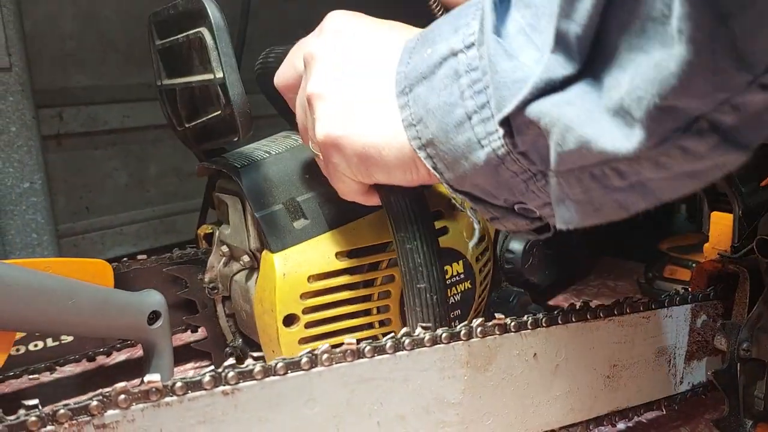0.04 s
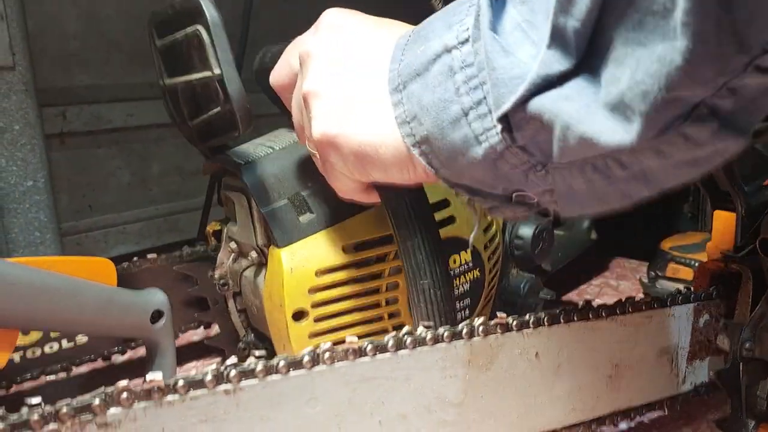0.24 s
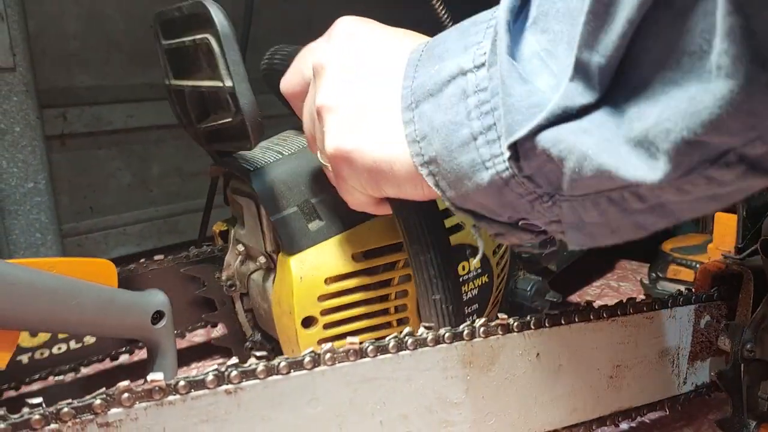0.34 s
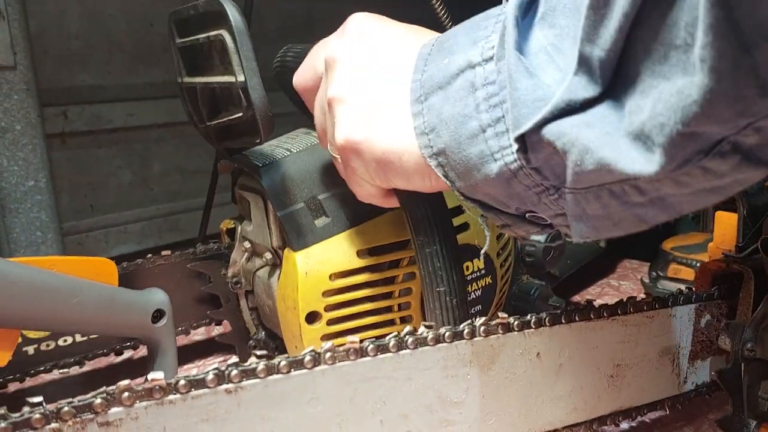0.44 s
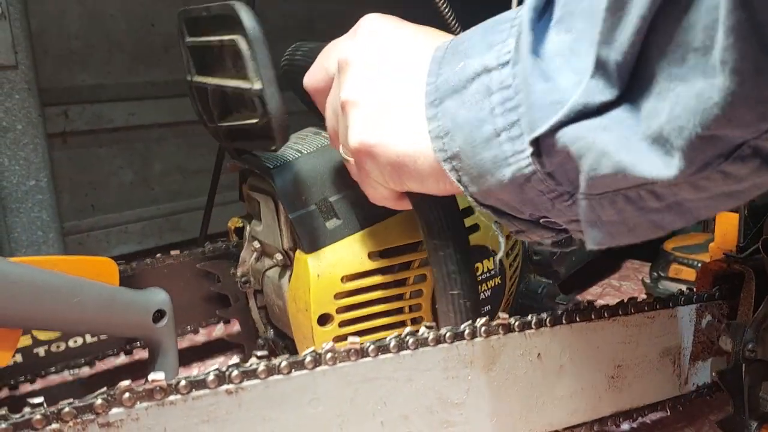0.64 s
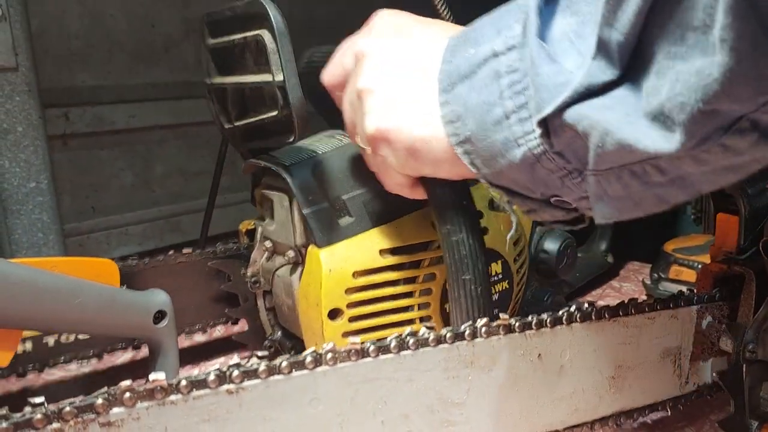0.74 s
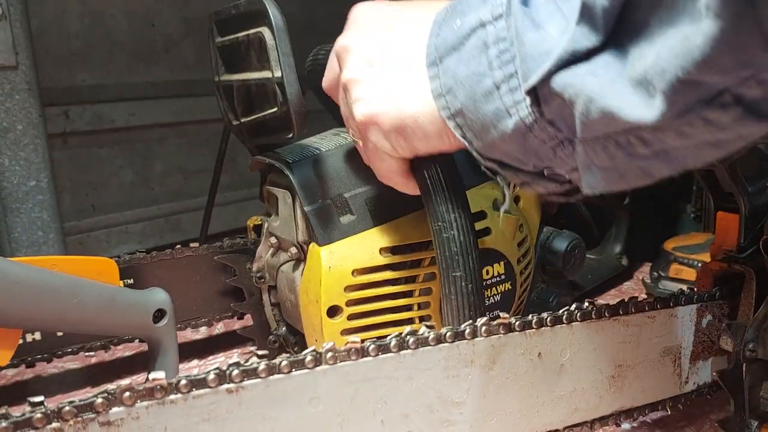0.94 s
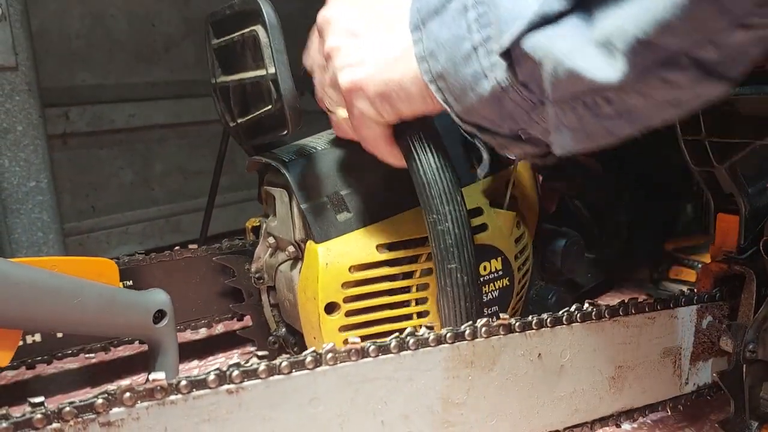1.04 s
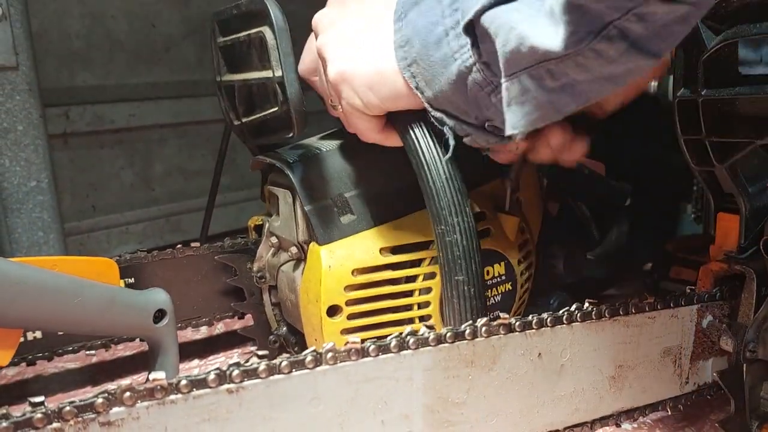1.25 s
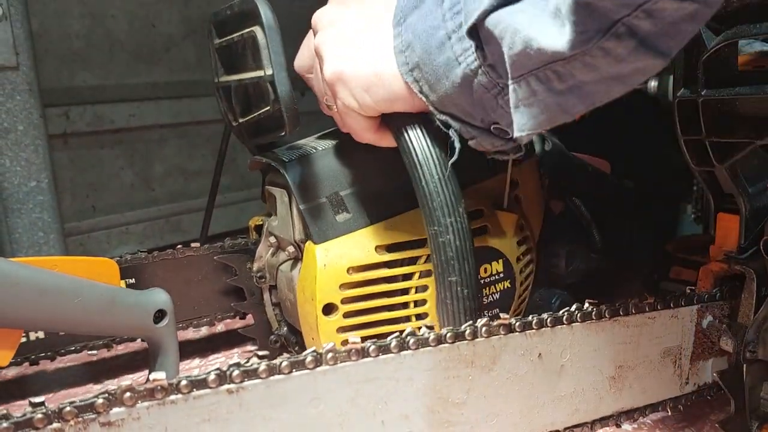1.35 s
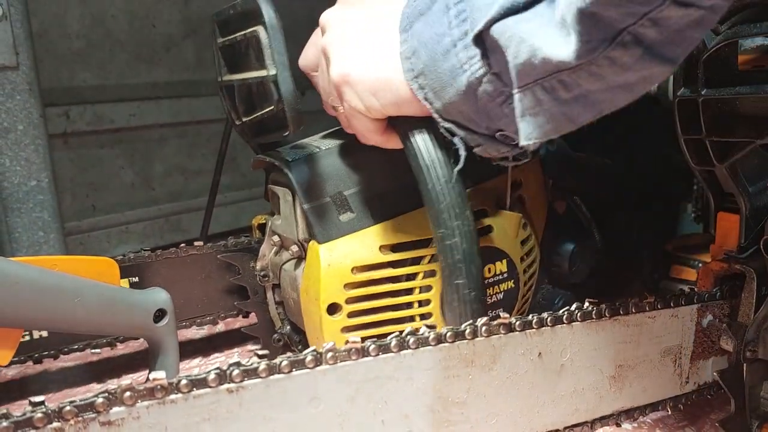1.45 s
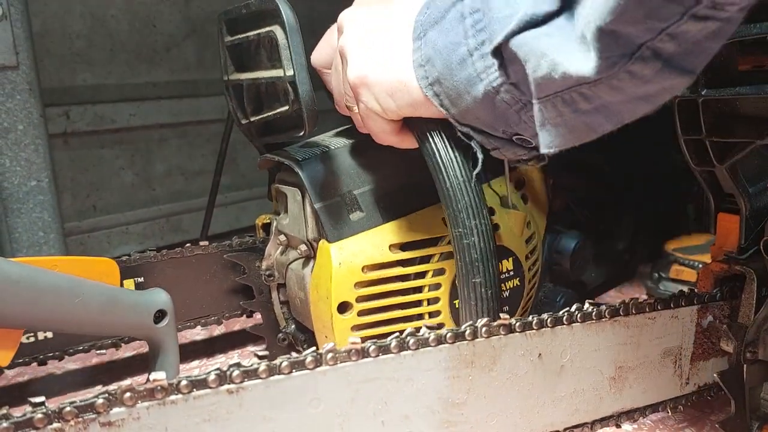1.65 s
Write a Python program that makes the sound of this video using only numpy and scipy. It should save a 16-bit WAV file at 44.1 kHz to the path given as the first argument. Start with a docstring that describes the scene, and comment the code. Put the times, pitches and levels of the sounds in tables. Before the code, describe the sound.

Close up, a chainsaw starter catches and jolts on a hollow metal bed, knocks, then catches again harder; the cord winds in with a ratcheting metallic tick and a final clack, in a nearly quiet place with close walls.

```python
"""Chainsaw starter, two tugs

A chainsaw's recoil starter is tugged twice, close by: the pawls catch with a clack and the saw jolts on a
hollow metal bed. Then the spring winds the rasping cord back in, the pawls tick over the flywheel and ring,
and the handle clacks home; the engine never fires. Clacks and scrapes are shaped noise, rings and booms
are fading sine waves, and nearby walls and still air surround them."""
import sys
import numpy as np
from scipy import signal
from scipy.fft import rfft, irfft, next_fast_len
from scipy.io import wavfile
from scipy.ndimage import uniform_filter1d, map_coordinates

SR = 44100
rng = np.random.default_rng(int(sys.argv[2]) if len(sys.argv) > 2 else 0)


def store_pcm(level_fs):
    """Save levels as 16-bit WAV."""
    pcm = np.round(np.clip(level_fs, -1, 1) * 32767).astype(np.int16)
    wavfile.write(sys.argv[1], SR, np.atleast_2d(pcm).T)


N = 74970  # length of the scene [samples]
T = np.arange(SR // 2) / SR  # the half second [s] given to each single hit

# In all tables, t60 is the time a sound takes to fade by 60 dB.
# how alike the two ears hear each pitch: (frequency [Hz], left-right likeness [-1 to 1])
LIKENESS = [(60, 1), (140, 1), (300, 0.67), (640, 0.69), (1400, 0.031), (3000, 0.23), (6500, -0.06),
            (14000, -0.18)]
# the steel of the first pawl while it is free: (frequency [Hz], level [dB], t60 [s])
FREE_PAWL = [(5662, 0, .17), (5745, -19, .1), (6368, -15, .09), (12054, -18, .11), (12453, -19, .1),
             (13532, -19, .1)]


def amp(db):
    """Turn decibels into a plain gain."""
    return 10 ** (np.asarray(db) / 20)


def unit(x):
    """Scale a sound to an average strength (rms) of 1."""
    return x / np.sqrt(np.mean(x ** 2) + 1e-20)


def along(points, hz):
    """Read a curve of (Hz, value) points, with frequency on a log axis."""
    point_hz, values = np.transpose(points)
    return np.interp(np.log(hz + 1), np.log(point_hz + 1), values)


def level(rows):
    """Gain per sample from (time [s], level [dB]) points."""
    return amp(np.interp(np.arange(N) / SR, *np.transpose(rows)))


def fade(t60):
    """Exponential decay, as in anything that loses a fixed share of its motion per moment."""
    return np.exp(-np.log(1000) * T / t60)


def rise(seconds):
    """Soft start that climbs quickly at first, then levels off."""
    return 1 - np.exp(-T / seconds)


def add(out, s, x):
    """Mix x into out from time s."""
    start = max(round(s * SR), 0)
    out[:, start:start + x.shape[-1]] += x[..., :N - start]


def filtered(x, response):
    """Multiply the spectrum of x by a response of frequency."""
    size = x.shape[-1]
    padded = next_fast_len(size + 4096)
    spectrum = rfft(x, padded) * response(np.fft.rfftfreq(padded, 1 / SR))
    return irfft(spectrum, padded)[..., :size]


def ear_angle(hz):
    """Half the angle between the ears: zero when they hear the same, wider when they differ."""
    return np.arccos(np.clip(along(LIKENESS, hz), -1, 1)) / 2


def noise(colour, size, tilt_db=0, grain_db=0):
    """Stereo noise of rms 1, tilted per octave and made grainy by quick random level changes."""
    grains = amp(grain_db * unit(uniform_filter1d(rng.standard_normal(size), size=30)))

    def shape(hz):
        tone = amp(along(colour, hz) + tilt_db * np.log2(hz / 1000 + 1))
        return tone * [np.cos(ear_angle(hz)), np.sin(ear_angle(hz))]

    # mid is shared by the ears; side has opposite signs in them
    mid, side = filtered(grains * rng.standard_normal((2, size)), shape)
    return unit(np.array([mid + side, mid - side]))


def ring(modes, scatter_db):
    """Fading sine waves of a struck body, random in level; where the ears differ, out of step between them."""
    out = np.zeros((2, len(T)))
    for (hz, db, t60), (size, skew) in zip(modes, rng.standard_normal((len(modes), 2))):
        apart = ear_angle(hz) * np.tanh(2 * skew)
        wave = np.sin(2 * np.pi * hz * T + np.array([[apart], [-apart]]))
        out += amp(db + scatter_db * size) * fade(t60) * wave
    return out


def wobble(rate):
    """A smooth random curve for each ear, partly shared, with rate random knots a second."""
    def curve():
        knots = rng.standard_normal(int(N * rate / SR) + 4)
        return map_coordinates(knots, [np.arange(N) * rate / SR])

    return .8 * curve() + .6 * np.array([curve(), curve()])


def steel(modes, strikes):
    """Steel keeps ringing from strike to strike; each (time, dB) tops up the energy of its modes."""
    waver_db, waver_rad, waver_per_s = 1.3, 0.2, 60  # slight flutter of the ring
    out = np.zeros((2, N))
    for hz, db, t60 in modes:
        energy = np.zeros((2, N))
        for (s, strike_db), luck in zip(strikes, rng.standard_normal(len(strikes))):
            strike = amp(db + strike_db + 1.0 * luck) * rise(0.0019) * fade(t60)
            add(energy, s, strike ** 2)
        phase = 2 * np.pi * (hz * np.arange(N) / SR + rng.random()) + waver_rad * wobble(waver_per_s)
        out += np.sqrt(energy) * amp(waver_db * wobble(waver_per_s)) * np.sin(phase)
    return out


def hollow(x):
    """The hollow casing strengthens or weakens bands of a noise, which is then set to rms 1."""
    # hollow resonances of the casing: (frequency [Hz], width [Hz], boost [dB])
    casing_bands = [(950, 120, 6), (2127, 140, -0.5), (2940, 100, 4), (3740, 100, 4), (4240, 220, 4.5),
                    (4860, 160, 6), (5510, 350, 5), (6850, 300, 5)]

    def boost(f):
        return amp(sum(db * np.exp(-((f - hz) / width) ** 2) for hz, width, db in casing_bands))

    return unit(filtered(x, boost))


def air():
    """Still air is a faint, steady noise."""
    # colour of the air: (frequency [Hz], relative level [dB])
    air_colour = [(15, -45.5), (25, 9.5), (140, -7), (209, -11.5), (598, -19), (722, -11), (804, -17.5),
                  (1750, -19), (8350, -34), (11800, -36), (15500, -50)]
    return amp(-50) * noise(air_colour, N)


def walls(x):
    """Nearby walls answer with many tiny echoes, blended into a short fading noise."""
    # how long the walls answer: (frequency [Hz], t60 [s])
    wall_fade = [(150, 0.12), (800, 0.16), (4000, 0.21), (14000, 0.114)]
    hz, t, grid = signal.stft(rng.standard_normal((2, len(T))), SR, nperseg=256)
    faded = grid * np.exp(-np.log(1000) * t / along(wall_fade, hz)[:, None])
    tail = signal.istft(faded, SR, nperseg=256)[1][:, :len(T)] * rise(0.0057)
    tail = filtered(tail / np.linalg.norm(tail[0]), lambda hz: hz / (hz + 300))  # less bass
    return signal.fftconvolve(x, tail, axes=1)[:, :N]


def cord():
    """The braid hisses and flicks through the eyelet and the spool scrapes round in short uneven slips."""
    # the cord slides through its eyelet: (time [s], level [dB])
    slide_level = [(0, -57.5), (.09, -60.5), (.14, -44.5), (.22, -48.5), (.3, -55), (.43, -68.5), (.5, -64),
                   (.55, -50.5), (.61, -52), (.68, -46.5), (.78, -42), (.87, -70), (1.3, -62),
                   (1.345, -37.5), (1.39, -76), (1.64, -69.5), (1.7, -46)]
    # colour of the slide: (frequency [Hz], relative level [dB])
    slide_colour = [(500, 13), (1500, 6), (3000, 3.5), (6000, 1), (9000, 0.5), (12500, 7.5), (15500, -3)]
    # the cord flicks against the eyelet: (time [s], level [dB], brightness [dB per octave])
    flick_rows = [(0.1598, -34, 5), (.701, -33, -3), (0.7436, -29, 0.5), (0.7603, -35, 3.5),
                  (.9034, -34, -6.5), (0.9122, -30, 0), (0.917, -34, 4)]
    # colour of the flicks: (frequency [Hz], relative level [dB])
    flick_colour = [(400, -6), (1200, 15.5), (2500, -7), (6000, -7), (11000, -3), (15500, -5)]
    # the spool rasps as it rewinds: (time [s], level [dB])
    rewind_level = [(.85, -84), (.89, -43), (.915, -34.5), (.935, -37), (1.06, -37.5), (1.18, -42),
                    (1.22, -44.5), (1.3, -64), (1.4, -74.5)]
    # colour of the rasp: (frequency [Hz], relative level [dB])
    rewind_colour = [(200, -13), (600, 0), (1100, 2), (2000, -11), (3500, -9.5), (6000, -11), (8000, -18.5),
                     (12000, -15), (15500, -34.5)]
    slips_per_s, slip_t60_s, slip_spread_db = 260, 0.016, 4
    rub_share = 0.42  # steady rub beneath slips of rms 1

    out = level(slide_level) * amp(wobble(90)) * noise(slide_colour, N, grain_db=2)
    for s, db, bright_db in flick_rows:
        flick = rise(0.000393) * fade(0.032) * noise(flick_colour, len(T), bright_db)
        add(out, s, amp(db) * flick)
    slips = (rng.random(N) < slips_per_s / SR) * amp(slip_spread_db * rng.uniform(-1, 1, N))
    fading_slips = signal.fftconvolve(slips, fade(slip_t60_s))[:N]
    uneven = unit(rub_share + unit(fading_slips))
    return out + level(rewind_level) * uneven * noise(rewind_colour, N, grain_db=2.5)


def knocks():
    """The plastic casing gives short woody knocks as the cord takes up or slackens."""
    # each knock; some lack the lower modes, by their low cut:
    # (time [s], level [dB], brightness [dB per octave], low cut [Hz])
    knock_rows = [(0.118, -41.5, 0.5, 100), (.159, -35, -1, 900), (0.3353, -16, 0.5, 100),
                  (.546, -33, -4, 760), (0.629, -49, 2, 100), (0.6612, -18, 0.9, 100), (.931, -29, -7, 600),
                  (1.0752, -28.5, -4, 700), (1.2442, -41, -8.5, 503), (1.681, -32, -11, 590)]
    # colour of the crack: (frequency [Hz], relative level [dB])
    knock_colour = [(150, -13.5), (450, -8), (700, 2.5), (1500, -14), (2100, -9.5), (3000, -25.5),
                    (6000, -27.5), (8500, -38), (15000, -41.5)]
    # ringing of the casing: (frequency [Hz], level [dB], t60 [s])
    knock_modes = [(262, 0, .09), (435, -4, .07), (485, -2, .07), (600, -12, .08), (840, -9, .05),
                   (985, -4, .05), (1265, -6, .055), (1600, -16, .04), (1975, -8, .035), (2065, -7, .035),
                   (2380, -18, .03), (2800, -18, .03), (3450, -20, .03), (4230, -17, .028),
                   (5500, -21, .02)]
    out = np.zeros((2, N))
    for s, db, bright_db, lowest_hz in knock_rows:
        crack = hollow(noise(knock_colour, len(T), bright_db)) * (fade(0.031) + amp(-15.5) * fade(0.081))
        body = ring(knock_modes, scatter_db=2.0)
        knock = amp(db) * rise(0.00021) * (amp(-0.5) * crack - amp(-2.2) * body)
        high_pass = signal.butter(2, lowest_hz, "high", fs=SR, output="sos")
        add(out, s, signal.sosfilt(high_pass, knock))
    return out


def handle():
    """The handle lands on the housing, bounces, and shakes the seated pawl once more."""
    # each landing: (time [s], level [dB], brightness [dB per octave], knock [dB], steel ring [dB])
    landing_rows = [(1.3174, -24, 3, -27, -27.5), (1.3409, -29.5, -6, -22.5, -55),
                    (1.3682, -48, 11.5, -60, -70)]
    # colour of the crack: (frequency [Hz], relative level [dB])
    handle_colour = [(200, -14.5), (650, 3.5), (880, 3), (1100, 0.5), (1400, -10.5), (2000, -21),
                     (2400, -2), (3400, -15), (6300, -5.5), (9000, -18.5), (15000, -23)]
    # ringing of the knock: (frequency [Hz], level [dB], t60 [s])
    handle_modes = [(883, -7, 0.041), (1087, -5, 0.043), (1690, -5, 0.017), (2350, -12, 0.018)]
    seated_share = 0.28  # of its ring time that a seated pawl keeps
    out = np.zeros((2, N))
    for s, db, bright_db, knock_db, _ in landing_rows:
        crack = noise(handle_colour, len(T), bright_db) * (fade(0.035) + amp(-14.5) * fade(0.0723))
        knock = ring(handle_modes, scatter_db=2.5)
        add(out, s, rise(0.000309) * (amp(db) * crack + amp(knock_db) * knock))
    seated = [(hz, db, t60 * seated_share) for hz, db, t60 in FREE_PAWL]
    return out + steel(seated, [(s, steel_db) for s, *_, steel_db in landing_rows])


def pawls(count=3):
    """A pawl drops off each flywheel lug, bounces and scrapes; the pawls and their spring ring until they seat."""
    # each tick as the cord rewinds: (time [s], click before the gains below [dB],
    # brightness [dB per octave], ring of first pawl [dB], of second pawl [dB], of their spring [dB])
    tick_rows = [(0.9411, -21, 0.5, -21.5, -25.5, -29), (0.978, -20, 3, -18, -24.5, -47),
                 (1.0142, -22.5, -1, -19.5, -33, -28.5), (1.0497, -21, -2, -18, -30, -30.5),
                 (1.085, -19.5, 2.5, -19, -21, -24.5), (1.1231, -22, 0, -15, -19, -45),
                 (1.1653, -24, -3, -42, -26, -24.5), (1.2252, -24.5, 3, -40, -27, -27)]
    # colour of the scrape: (frequency [Hz], relative level [dB])
    tick_colour = [(500, -2), (1000, -2.5), (2000, -0.5), (3500, -2.5), (4500, -2.5), (5000, 8),
                   (5700, 6.5), (6500, 2), (7200, -2), (8250, -9), (9000, -1.5), (10500, -8), (12200, 8),
                   (13000, -9.5), (13700, -1.5), (15500, -8.5)]
    # the lug answers each contact briefly: (frequency before detuning [Hz], level [dB], t60 [s])
    lug_modes = [(1054, -7, 0.035), (1760, -3.5, 0.024), (2770, -11.5, 0.017), (4360, -2.5, 0.024),
                 (4750, -13.5, 0.031), (6340, -4, 0.03), (6520, 2.5, 0.028), (8320, -4, 0.0405),
                 (11070, -4, 0.059), (12130, -6, 0.026), (12170, -1, 0.041), (14000, 0, 0.031)]
    # the steel of the second pawl: (frequency [Hz], level [dB], t60 [s])
    second_pawl = [(5471, -1, .18), (5528, -2, .18), (6418, -13, .05), (7698, -18, .1), (8258, -19, .1),
                   (12545, -18, .1), (13503, -16, .09)]
    # the steel of the pawls' spring: (frequency [Hz], level [dB], t60 [s])
    spring_modes = [(5137, 0, .17), (11165, -12, .12)]
    lug_db, bounce_loss_db = -7.5, 4.5
    bounce_s = 0.0037  # the least delay per bounce, counted from the first contact
    lug_detune = .02  # each contact lands on a slightly different spot of the lug
    seat_s, seat_db_per_s = 1.24, 201  # the pawls come to rest, which chokes their ring

    out = np.zeros((2, N))
    for s, click_db, bright_db, *_ in tick_rows:
        scrape_fade = np.minimum(1, amp(5.0) * fade(0.038) + amp(-6) * fade(0.16))
        scrape = noise(tick_colour, len(T), bright_db, grain_db=2.0) * scrape_fade
        add(out, s, amp(click_db - 2.0) * rise(0.00064) * scrape)
        for k, (slip, spot) in enumerate(rng.random((count, 2))):
            detune = 1 + lug_detune * (2 * spot - 1)
            lug = ring([(hz * detune, db, t60) for hz, db, t60 in lug_modes], scatter_db=5)
            contact_db = click_db + lug_db - bounce_loss_db * k
            add(out, s + bounce_s * k * (1 + slip / 2), amp(contact_db) * rise(0.000067) * lug)
    times, _, _, *ring_levels = np.transpose(tick_rows)
    parts = (FREE_PAWL, second_pawl, spring_modes)
    ringing = sum(steel(modes, list(zip(times, dbs))) for modes, dbs in zip(parts, ring_levels))
    return out + ringing * amp(-seat_db_per_s * np.maximum(np.arange(N) / SR - seat_s, 0))


def thumps():
    """Jolts push dully and set the hollow bed booming, small scuffs squeak, and the casing shudders in the hand."""
    # the saw jolts on its bed; the two highest-pitched rows are small scuffs that squeak:
    # (time [s], ringing level [dB], pitch [Hz], base t60 [s], contact push [dB])
    thump_rows = [(.006, -31, 140, 0.12, -56), (0.1148, -24.5, 167, 0.075, -17),
                  (.128, -14, 160, 0.026, -24), (.166, -17, 342, 0.058, -18),
                  (0.2212, -13, 133.5, 0.13, -4), (0.225, -10.5, 268.2, 0.09, -36),
                  (0.2314, -11.5, 162, 0.12, -3), (0.269, -33, 150, 0.076, -30),
                  (.307, -18, 541, 0.044, -22), (0.334, -9, 132.5, 0.092, -26),
                  (0.6276, -26, 184, 0.15, -13), (0.6602, -11.5, 142.4, 0.12, -16),
                  (0.705, -13, 144, 0.064, -19), (.752, -13.5, 152, 0.056, -34),
                  (0.7925, -3.5, 145.2, 0.09, -9.5), (0.8107, -4.5, 164, 0.038, -9),
                  (0.931, -21, 117, 0.0724, -18), (1.07, -32.5, 135, 0.14, -32.5),
                  (1.2406, -13, 135.6, 0.073, -46), (1.295, -37.5, 145.4, 0.23, -41.5),
                  (1.416, -28, 130, 0.069, -39), (1.479, -36.5, 133.8, 0.073, -56),
                  (1.57, -34.5, 153.5, 0.16, -30)]
    # ringing of each jolt or scuff: (pitch ratio, level [dB], share of base t60)
    thump_modes = [(.52, -15, 0.31), (1, 4, 1), (1.85, -9.5, 0.63), (2.9, -8.5, 0.49)]
    # the casing shudders: (time [s], level [dB])
    shudder_level = [(0, -40.5), (.09, -45.5), (.16, -33), (.26, -26), (.36, -25.5), (.43, -40.5),
                     (.52, -57), (.6, -40), (.68, -25), (.74, -36), (.81, -24.5), (.87, -34), (1.1, -43.5),
                     (1.21, -54), (1.33, -40), (1.52, -58.5), (1.66, -60), (1.7, -27.5)]
    # colour of the shudder: (frequency [Hz], relative level [dB])
    shudder_colour = [(25, -72), (60, 1.5), (145, 2.5), (210, -5), (290, -3), (500, -17), (1000, -24),
                      (2500, -35.5), (6000, -45.5), (15000, -95)]
    contact_s, attack_s = 0.0016, 0.0037  # contact_s is half the time that a contact presses
    out = np.zeros((2, N))
    push = np.sin(np.pi / 2 * np.minimum(T / contact_s, 2)) ** 2
    for s, db, hz, t60, contact_db in thump_rows:
        modes = [(hz * ratio, mode_db, t60 * share) for ratio, mode_db, share in thump_modes]
        body = ring(modes, scatter_db=.5)
        add(out, s, -amp(db) * rise(attack_s) * body - amp(contact_db) * push)
    return out + level(shudder_level) * noise(shudder_colour, N, grain_db=6.0)


def catches():
    """The pawls bite and the whole saw clacks and rattles: coloured noise over a ringing body."""
    # the starter catches against the engine: (time [s], level [dB], brightness [dB per octave],
    # ring over the clack [dB], ring pitch ratio, rattle [Hz])
    catch_rows = [(0.2116, -26, -8.5, -12.5, 1, 1650), (0.2215, -13, -3, -8.5, 0.95, 1650),
                  (0.2321, -24.5, 3, -4, 0.94, 3970), (0.249, -29, 0.5, -5, 0.94, 3300),
                  (.789, -22.5, 4, -1, 1, 2300), (.7915, -14, -0.55, -6.5, 1, 2410),
                  (0.8086, -16, -2, -14, 1, 2220)]
    # colour of the clack: (frequency [Hz], relative level [dB])
    catch_colour = [(150, 3), (400, -12.5), (720, -5.5), (1000, -18.5), (1400, -10), (2200, -13.5),
                    (3000, -15.5), (4000, -18), (6800, -23.5), (8500, -32), (15000, -36.5)]
    # ringing of the saw: (frequency before the pitch ratio [Hz], level [dB], t60 [s])
    catch_modes = [(269, -4.5, 0.063), (403, -3, 0.14), (717, 2, 0.071), (743.6, 2.5, 0.1),
                   (921, 3.5, 0.062), (1190, -1.5, 0.039), (1700, -3.5, 0.051), (2150, -0.5, 0.041),
                   (3590, -8, 0.053), (5590, -15.5, 0.035)]
    rattle_db, rattle_octaves = 6.5, 0.14  # boost and width of the loose part that rattles
    out = np.zeros((2, N))
    for s, db, bright_db, ring_db, pitch, rattle_hz in catch_rows:
        def rattle(hz):
            octaves_away = np.log2((hz + 1) / rattle_hz)
            return amp(rattle_db * np.exp(-(octaves_away / rattle_octaves) ** 2))

        clack = filtered(hollow(noise(catch_colour, len(T), bright_db, grain_db=1.0)), rattle)
        clack = clack * (fade(0.037) + amp(-5.5) * fade(0.16))
        body = ring([(hz * pitch, mode_db, t60) for hz, mode_db, t60 in catch_modes], scatter_db=1)
        add(out, s, amp(db) * rise(0.00024) * (clack - amp(ring_db) * body))
    return out


def scene():
    """The saw, the answer of its surroundings and the still air."""
    saw = cord() + knocks() + handle() + pawls() + thumps() + catches()
    return air() + amp(-10) * walls(saw) + saw


def record(dry):
    """The microphones tilt left and right apart, shed deep bass, round off peaks and cut the top."""
    # balance of the two sides: (frequency [Hz], left minus right [dB])
    balance = [(60, 0), (130, 4.5), (290, 0.5), (640, 4), (2000, 0.5), (6000, 3.5), (12000, 0)]
    lead_rad, lead_hz = 0.23, 350  # the bass reaches the left ear first, by this phase, fading out upwards
    low_cut_hz, top_hz = 48.3, 15750
    sides = np.array([[1], [-1]]) / 2

    def microphones(hz):
        lead = np.exp(1j * sides * lead_rad / (1 + (hz / lead_hz) ** 2))
        low_cut = (1j * hz / (low_cut_hz + 1j * hz)) ** 2
        return amp(along(balance, hz) * sides) * lead * low_cut

    x = filtered(dry, microphones)
    x = x / (1 + np.abs(x) ** 6) ** (1 / 6)  # rounds off peaks near full scale
    return filtered(x, lambda hz: hz < top_hz)


dry = scene()
out = record(dry)
store_pcm(out)
```